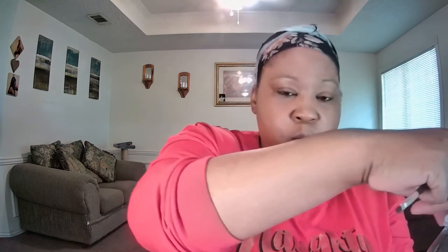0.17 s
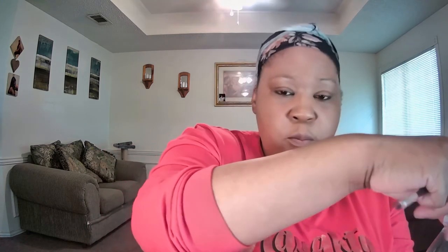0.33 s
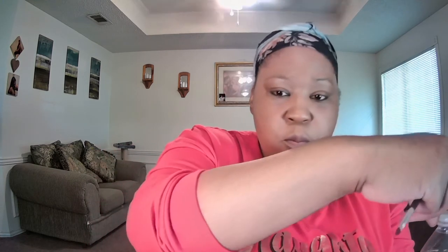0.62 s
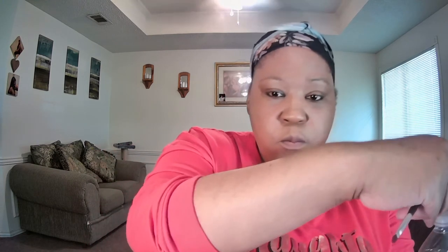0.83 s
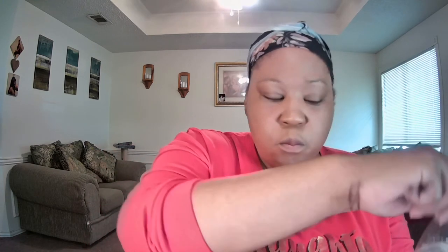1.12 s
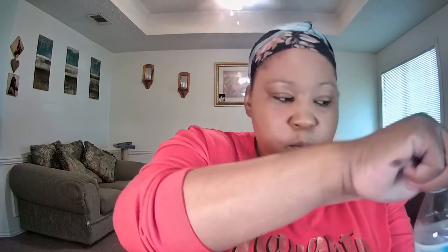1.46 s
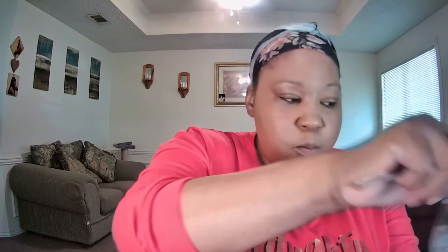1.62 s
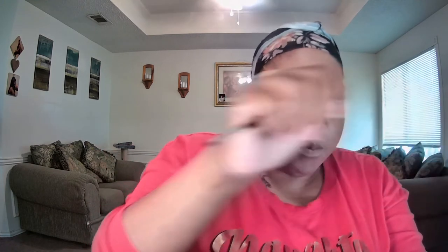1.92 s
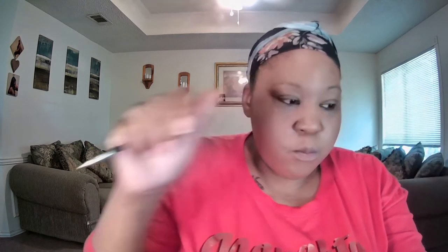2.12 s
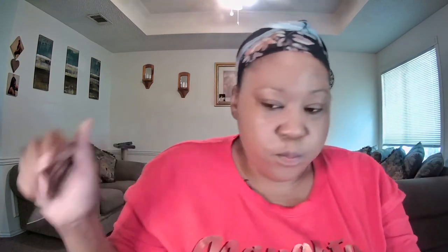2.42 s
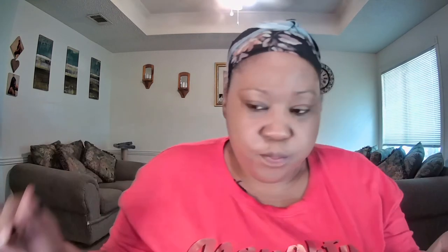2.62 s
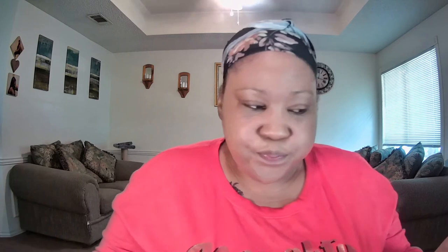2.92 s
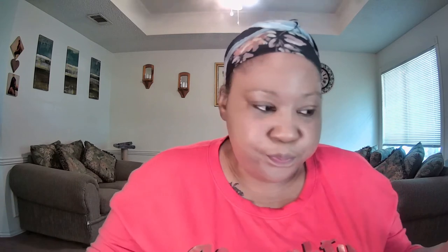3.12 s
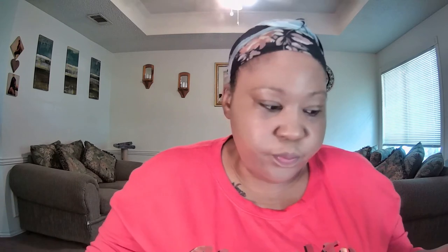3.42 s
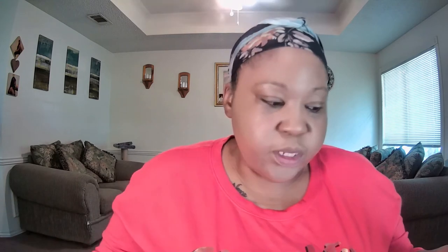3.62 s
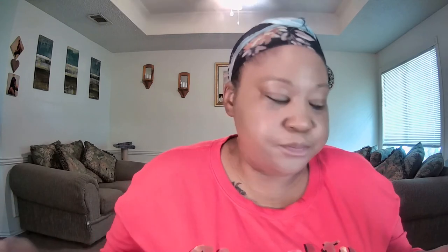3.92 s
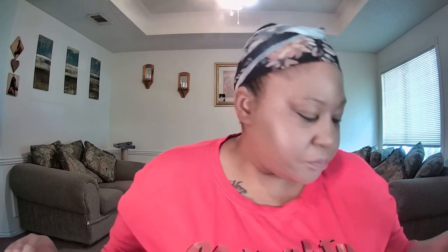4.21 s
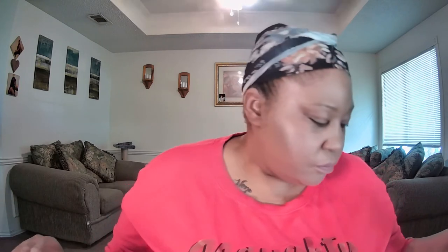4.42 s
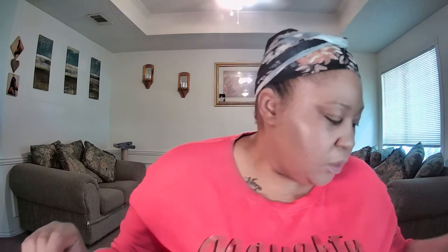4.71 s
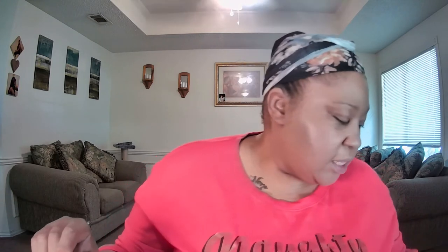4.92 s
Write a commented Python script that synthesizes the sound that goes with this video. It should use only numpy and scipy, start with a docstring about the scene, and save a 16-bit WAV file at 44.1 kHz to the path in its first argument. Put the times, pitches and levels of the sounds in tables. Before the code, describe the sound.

Small hard plastic tools tick, scrape and knock on a table in a furnished room, one very loud early tap, later a cap click.

```python
"""Plastic ticks, scrapes, duller knocks and one cap click over steady fan hiss; the loudest tap clips.
Small make-up tools and a bottle are rattled, rubbed and set down on a table beside a laptop.
Ticks and rubs ring the microphone port around 2.5 kHz; knocks ring the object and the table's low modes.
A cap clicks on its own modes; a small furnished room answers the ticks with band-wise noise tails."""
import sys
import numpy as np
from scipy import signal
from scipy.fft import rfft, irfft
from scipy.io import wavfile
from scipy.ndimage import uniform_filter1d

SR = 44100
rng = np.random.default_rng(int(sys.argv[2]) if len(sys.argv) > 2 else 0)


def int16_out(signal):
    """Quantize to a 16-bit WAV file."""
    q = np.round(np.clip(np.atleast_2d(signal).T, -1, 1) * 32767)
    wavfile.write(sys.argv[1], SR, q.astype(np.int16))


N = 222821

# Fan and circuit noise spectrum. Each row: frequency in Hz, relative density in dB.
HISS_SPECTRUM = [(20, -3), (45, -18.5), (100, 0), (220, -0.5), (400, -4.5), (600, -8.5), (2000, -10),
                 (2520, -3), (3000, -13.5), (7800, -17.5)]
HISS_DB, FAN_HZ, FAN_DB = -59, 410, -72.5

# Room bands. Each row: centre in Hz, width in Hz.
ROOM_BANDS = [(620, 300), (1650, 1200), (2510, 520), (3250, 800), (4050, 800), (5300, 1800)]
# Room tail, one row per band. Each row: relative level in dB, t60 in seconds.
ROOM_TAILS = [(-12, 0.32), (-9.5, 0.26), (2, 0.36), (-8, 0.25), (-13, 0.33), (-20.5, 0.17)]
ROOM_SEND_DB = -29.5
SHAKE_DB_PER_DB = 1.2  # room drive per dB of tick
WALL_S, WALL_DB = .0108, -13  # one clear echo from the nearest wall

# Faint low boom. One row: start in seconds, level in dB, frequency in Hz, t60 in seconds.
BOOM = (3.6, -60, 78, 1.5)

# Fingers and tools rubbing, one list per rub.
# Each row: time in seconds, level in dB at the port resonance.
RUBS = [
    [(0.0, -63), (0.284, -61), (0.3, -37)],
    [(0.95, -60), (1.005, -46.5), (1.2, -60.5)],
    [(1.62, -56), (1.822, -61.5), (2.09, -51)],
    [(2.195, -55), (2.205, -29), (2.236, -35.5), (2.26, -58)],
    [(3.862, -33), (3.94, -37.5), (4.0, -50), (4.066, -55)],
]
# Rub colours, one row per rub, levels relative to the port resonance.
# Each row: rasp in dB, dull in dB, bright at full pressure in dB, bright centre in Hz.
RUB_COLOURS = [(-7, -19, 1.5, 1820), (-9, -26.5, -22, 2300), (-8, -19, -16, 3900), (-8, -18.5, -9, 3860),
               (-1, -10.5, -17, 7000)]
PORT_HZ, PORT_WIDTH_HZ = 2550, 350

# Low modes of the table. Each row: frequency in Hz, mean relative level in dB, t60 in seconds.
TABLE_MODES = [(121, 2, 0.17), (164, 3.5, 0.089), (235.3, 6, 0.073)]
# Dull knocks through the table.
# Each row: start in seconds, ring level in dB, ring in Hz, ring t60 in seconds, table thud in dB.
KNOCKS = [(0.287, -31.5, 122, 0.21, -55), (0.293, -34.5, 683, 0.12, -55), (0.345, -16, 493, 0.019, -31),
          (0.365, -29.5, 340, 0.047, -40.5), (0.4413, -8, 600, 0.018, -38), (0.5, -27, 588, 0.049, -51),
          (0.738, -41.5, 642, 0.04, -51), (1.213, -37.5, 695, 0.018, -65), (1.241, -18, 595, 0.018, -45.5),
          (1.248, -23.5, 726, 0.028, -47), (1.304, -29.5, 587, 0.024, -43.5),
          (1.492, -35.5, 600, 0.022, -64.5), (1.566, -31, 620, 0.012, -67.5),
          (1.596, -32.5, 236, 0.072, -56.5), (2.137, -32.5, 700, 0.019, -48), (2.594, -24, 400, 0.045, -35),
          (2.6455, -15, 430, 0.022, -35), (2.665, -30, 360, .06, -46), (3.463, -47.5, 520, .08, -73),
          (3.484, -41, 493, 0.079, -60.5), (3.517, -37, 518, 0.083, -59.5), (3.519, -40, 285, 0.082, -62),
          (3.874, -37.5, 403, 0.072, -76)]
KNOCK_RISE_PER_T60, KNOCK_ROUGHNESS = 0.08, 0.3
JAR_AT_0_DB, JAR_DB_PER_DB, JAR_T60_RATIO = -7, 1.4, 3.2  # jarring against knock level and t60

# Modes of a small hard cap. Each row: frequency in Hz, relative level in dB, t60 in seconds.
CAP_MODES = [(1197, -28, 0.064), (1640, -10, 0.021), (2012, -10.5, 0.023), (2450, -10.5, 0.029),
             (2665, -2.5, 0.022), (3460, -6, 0.013), (3930, -4.5, 0.016), (4270, -10, 0.0099),
             (5030, -14, 0.011), (5870, -20.5, 0.0099), (7100, -21, 0.0081)]
CAP_S, CAP_DB = 4.2503, -10.5
CAP_REBOUND_S, CAP_REBOUND_DB = 0.00353, -7.5
CAP_RATTLE_DB, CAP_RATTLE_T60_S = -31.5, 0.16
# Dense bright tail of the click. One row: centre in Hz, width in Hz, level in dB, t60 in seconds.
CAP_FIZZ = (4400, 1800, -39.5, .17)

# Hard plastic ticks. Each row: time in seconds, ring level in dB, ring in Hz, bright crack in dB,
# dull crack in dB, clatter t60 in seconds.
TICKS = [(0.2985, -19, 2517, -55, -38, 0.17), (0.312, -29, 2290, -73, -47, 0.079),
         (0.345, -33.5, 2140, -39, -30, 0.04), (0.4022, -19.5, 2390, -44, -31.5, 0.2),
         (0.443, 2, 2190, -8, -28, 0.028), (0.4445, 9.5, 2581, -14.5, -4, 0.074),
         (0.632, -20, 2483, -63.5, -46, 0.13), (0.7385, -12.5, 2506, -34, -33, 0.094),
         (1.017, -22.5, 2555, -87, -66.5, 0.46), (1.2137, -10.5, 2184, -29.5, -24, 0.14),
         (1.2432, -6.5, 2504, -26, -16.5, 0.13), (1.308, -13, 2550, -34, -34, 0.11),
         (1.4117, -35, 2540, -60, -40, 0.25), (1.4455, -36.5, 2510, -70, -60, 0.29),
         (1.495, -32.5, 2564, -66, -35.5, 0.47), (1.521, -27, 2520, -51, -53, 0.1),
         (1.5258, -23.5, 2450, -47, -34, 0.071), (1.566, -34.5, 1750, -73, -46, 0.35),
         (1.596, -36.5, 2600, -70, -55, 0.3), (1.6035, -35, 1955, -73, -50, 0.15),
         (2.0911, -37.5, 2280, -62, -32, 0.19), (2.098, -17, 2500, -33, -27, 0.066),
         (2.1288, -23, 2690, -35.5, -27, 0.068), (2.132, -21.5, 2500, -53.5, -30, .1),
         (2.139, -10.5, 2608, -43, -28, 0.043), (2.144, -21, 2550, -55, -34, 0.1),
         (2.206, -19, 2580, -48, -32.5, .05), (2.2175, -21, 2530, -55, -42, 0.13),
         (2.373, -39.5, 2010, -69, -49.5, 0.16), (2.5908, -25, 2075, -60, -31, 0.2),
         (2.5975, -19.5, 2250, -52, -22, 0.14), (2.6054, -19.5, 2647, -55, -27, 0.13),
         (2.646, -35, 2500, -50, -34, 0.12), (3.86, -15, 2773, -41, -38, 0.1),
         (3.8733, -16, 2584, -31, -29, 0.37), (3.885, -18.5, 2795, -49, -50, 0.4),
         (3.93, -25.5, 2880, -34.5, -35, 0.15), (3.974, -33, 2550, -48, -46, .1),
         (4.007, -31, 2660, -53.5, -46, 0.1), (4.031, -35, 2510, -62.5, -41.5, .2),
         (4.283, -31, 2700, -60, -61, 0.16), (4.9911, -43, 2515, -70.5, -71, .056)]
TICK_LEAD_S = .0015  # onset ahead of the listed time
RING_T60_S, RING_RISE_S, RING_RISE_MAX_S = 0.024, .0013, .008
CRACK_T60_S, CRACK_RISE_S = 0.0065, 0.0014
SNAP_DB = -14  # top of the bright crack, relative to it
SOFTER_PER_DB = .025  # growth of ln(rise) per dB of bright crack under the ring
CLATTER_DB, CLATTER_CRACK_DB = -18.5, 4  # clatter relative to its tick; extra crack in it

INPUT_BAND_HZ, OUTPUT_TOP_HZ = 7900, 15547
INPUT_OFFSET, CLIP_LEVEL = -0.0011, .98  # of full scale
CONVERTER_NOISE_DB = -100


def undb(db):
    """Decibels to gain."""
    return 10 ** (np.asarray(db) / 20)


def band(x, hz, width_hz, order=2):
    """Band-pass of given centre and width."""
    edges_hz = [max(hz - width_hz / 2, 20), hz + width_hz / 2]
    return signal.sosfilt(signal.butter(order, edges_hz, "band", fs=SR, output="sos"), x)


def unit(x):
    """Scale to rms 1."""
    return x / np.sqrt(np.mean(x ** 2))


def sine(hz, t):
    """Sine of fixed frequency, peak 1."""
    return np.sin(2 * np.pi * hz * t)


def swell(t, rise_s, t60_s):
    """Envelope that rises, then falls 60 dB in t60; peak 1."""
    rise = np.sin(np.pi / 2 * np.clip(t / max(rise_s, 1 / SR), 0, 1)) ** 2
    env = rise * 1000. ** (-np.maximum(t - rise_s, 0) / t60_s)
    return env / env.max()


def add(track, start_s, sound):
    """Mix a sound into a track at its start time."""
    i = int(start_s * SR)
    track[i:i + len(sound)] += sound[:N - i]


def walk(rate_hz):
    """Random levels at the given rate, joined by ramps; spread near 1."""
    hold = int(SR / rate_hz)
    steps = np.repeat(rng.standard_normal(N // hold + 1), hold)
    return uniform_filter1d(steps, hold)[:N] * 1.3


def hiss():
    """Fan and circuit noise of fixed spectrum, drifting in the bass, with a faint wavering fan tone."""
    hz = np.arange(N // 2 + 1) * SR / N + 1
    knot_hz, knot_db = np.transpose(HISS_SPECTRUM)
    shape = undb(np.interp(np.log(hz), np.log(knot_hz), knot_db))
    noise = unit(irfft(rfft(rng.standard_normal(N)) * shape, N))
    noise = noise + (undb(1.7 * walk(4.9)) - 1) * band(noise, 150, 180)
    phase = 2 * np.pi * np.cumsum(FAN_HZ + walk(42)) / SR
    tone = np.sin(phase) * undb(FAN_DB + 2.2 * walk(3.2))
    return undb(HISS_DB) * noise + tone


def room(x):
    """Scattered echoes and shaken objects: noise that swells over 5 ms and dies band by band."""
    t = np.arange(SR // 2) / SR
    block = 64  # samples of equal echo strength
    scatter_db = 3.3 * rng.standard_normal((len(ROOM_TAILS), len(t) // block + 1))
    scatter = undb(scatter_db.repeat(block, axis=1)[:, :len(t)])
    tail = np.zeros(len(t))
    for (hz, width_hz), (db, t60_s), uneven in zip(ROOM_BANDS, ROOM_TAILS, scatter):
        echoes = unit(band(uneven * rng.standard_normal(len(t)), hz, width_hz, order=3))
        tail += undb(db) * echoes * swell(t, 0.0052, t60_s)
    return signal.fftconvolve(x, tail)[:N]


def boom():
    """One decaying low sine, cut after half a second."""
    out, t = np.zeros(N), np.arange(SR // 2) / SR
    start_s, db, hz, t60_s = BOOM
    add(out, start_s, undb(db) * sine(hz, t) * swell(t, 0.1, t60_s))
    return out


def rubs():
    """Dense uneven micro-slips ring the port resonance and rasp around it."""
    t = np.arange(N) / SR
    slips = (rng.random(N) < 6000 / SR) * rng.standard_normal(N)
    slips = slips * undb(rng.exponential(size=N)) * undb(2.5 * walk(40))
    port = unit(band(slips, PORT_HZ, PORT_WIDTH_HZ))
    rasp = unit(band(slips, 2410, 1600, order=3))
    dull = unit(band(slips, 880, 1100))
    out = np.zeros(N)
    for rows, (rasp_db, dull_db, bright_db, bright_hz) in zip(RUBS, RUB_COLOURS):
        s, db = np.transpose(rows)
        level_db = np.interp(t, s, db)
        bright = unit(band(rng.permutation(slips), bright_hz, 590, order=3))
        bright = bright * undb(.6 * (level_db - db.max()))  # lighter pressure is duller
        colour = undb(rasp_db) * rasp + undb(dull_db) * dull + undb(bright_db) * bright
        gate = uniform_filter1d(1. * ((t > s[0]) & (t < s[-1])), size=600)
        out += gate * undb(level_db) * (port + colour)
    return out


def knocks():
    """A hollow, rough object ring, a dull jarring of things on the table, a thud of its low modes."""
    out, t = np.zeros(N), np.arange(SR // 2) / SR
    for start_s, db, hz, t60_s, thud_db in KNOCKS:
        mode_gains = undb(2 * rng.standard_normal(len(TABLE_MODES)))
        ring_noise, jar_noise = rng.standard_normal((2, len(t)))
        ring = sine(hz, t) + KNOCK_ROUGHNESS * unit(band(ring_noise, hz, 0.96 * hz))
        ring = undb(db) * ring * swell(t, KNOCK_RISE_PER_T60 * t60_s, t60_s)
        # harder knocks jar disproportionately more
        jar = undb(JAR_AT_0_DB + JAR_DB_PER_DB * db) * unit(band(jar_noise, 750, 800, order=3))
        jar = jar * swell(t, .003, JAR_T60_RATIO * t60_s)
        thud = np.zeros(len(t))
        for gain, (mode_hz, mode_db, mode_t60_s) in zip(mode_gains, TABLE_MODES):
            thud += gain * undb(mode_db) * sine(mode_hz, t) * swell(t, 0.0022, mode_t60_s)
        add(out, start_s, ring + jar + undb(thud_db) * thud)
    return out


def cap():
    """A cap clicks shut: blow, rebound and fine rattle ring its modes, with a dense bright fizz."""
    out, t = np.zeros(N), np.arange(SR // 5) / SR
    modes = np.zeros(len(t))
    for hz, db, t60_s in CAP_MODES:
        modes += undb(CAP_DB + db) * sine(hz, t) * swell(t, 0.0017, t60_s)
    rattle = undb(CAP_RATTLE_DB) * rng.standard_normal(len(t)) * swell(t, 0.0033, CAP_RATTLE_T60_S)
    blows = rattle * (rng.random(len(t)) < 3000 / SR)
    blows[0] += 1
    blows[int(CAP_REBOUND_S * SR)] += undb(CAP_REBOUND_DB)
    add(out, CAP_S, signal.fftconvolve(blows, modes))
    hz, width_hz, db, t60_s = CAP_FIZZ
    grains = rng.standard_normal(len(t)) * (rng.random(len(t)) < .05)
    fizz = unit(band(grains, hz, width_hz, order=3))
    add(out, CAP_S, undb(db) * fizz * swell(t, .002, t60_s))
    return out


def ticks():
    """Each tick rings the port, with noisy cracks above and below and a longer clatter of loose parts."""
    out, shake, t = np.zeros(N), np.zeros(N), np.arange(SR // 3) / SR
    for time_s, db, hz, bright_db, dull_db, clatter_t60_s in TICKS:
        port_noise, upper_noise, snap_noise, lower_noise, grain_noise = rng.standard_normal((5, len(t)))
        port = unit(band(port_noise, PORT_HZ, 380)) + .3 * unit(band(port_noise, 2350, 1400, order=4))
        upper = unit(band(upper_noise, 4200, 1400, order=3))
        snap = unit(band(snap_noise, 5700, 1400)) + .4 * unit(band(upper_noise, 7000, 1400))
        lower = unit(band(lower_noise, 1400, 1450, order=4))
        crack = undb(bright_db) * upper + undb(dull_db) * lower
        # neighbouring modes, as port noise, roughen the pure tone
        ring = undb(db) * (sine(hz, t) + 0.21 * port)
        # a softer contact is duller and pushes for longer
        rise_s = min(RING_RISE_S * np.exp(SOFTER_PER_DB * (db - bright_db)), RING_RISE_MAX_S)
        sharp = crack + undb(bright_db + SNAP_DB) * snap
        tick = ring * swell(t, rise_s, RING_T60_S) + sharp * swell(t, CRACK_RISE_S, CRACK_T60_S)
        grain = undb(CLATTER_DB + 0.73 * unit(band(grain_noise, 120, 290)))
        clatter = grain * (undb(db) * port + undb(CLATTER_CRACK_DB) * crack)
        clatter = clatter * swell(t, rise_s, clatter_t60_s)
        add(out, time_s - TICK_LEAD_S, tick + clatter)
        # impulse for the room: harder blows shake the table and all on it the more
        shake[int(time_s * SR)] = undb(SHAKE_DB_PER_DB * db)
    return out, shake


def scene():
    """Everything at the microphone."""
    near, shake = ticks()
    near = near + cap()
    add(near, WALL_S, undb(WALL_DB) * band(near, PORT_HZ, 1500))
    hits = near + knocks() + boom() + undb(ROOM_SEND_DB) * room(shake)
    # the small capsule passes little of the deepest thud
    hits = signal.sosfilt(signal.butter(2, 70, "high", fs=SR, output="sos"), hits)
    return (hits + rubs() + hiss())[None]


def record(dry):
    """Narrow-band laptop input, slightly offset; overloads clip flat and spill over its band edge."""
    input_filter = signal.ellip(10, .3, 75, INPUT_BAND_HZ, fs=SR, output="sos")
    narrow = signal.sosfilt(input_filter, dry)
    clipped = np.clip(narrow + INPUT_OFFSET, -CLIP_LEVEL, CLIP_LEVEL)
    noisy = clipped + undb(CONVERTER_NOISE_DB) * rng.standard_normal(dry.shape)
    output_filter = signal.ellip(8, .2, 60, OUTPUT_TOP_HZ, fs=SR, output="sos")
    return signal.sosfilt(output_filter, noisy)


dry = scene()
out = record(dry)
int16_out(out)
```